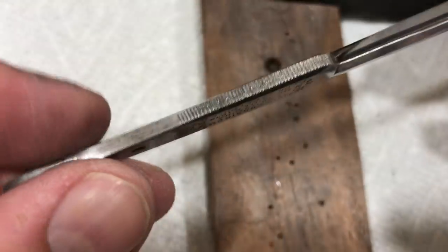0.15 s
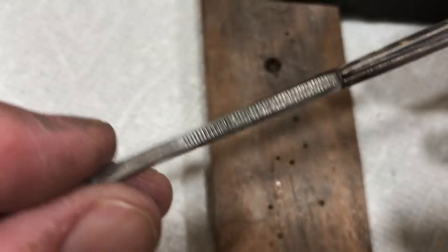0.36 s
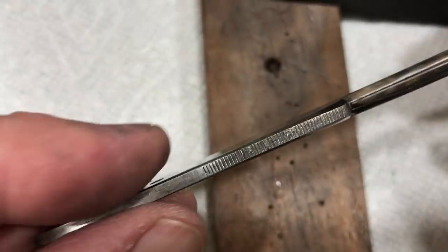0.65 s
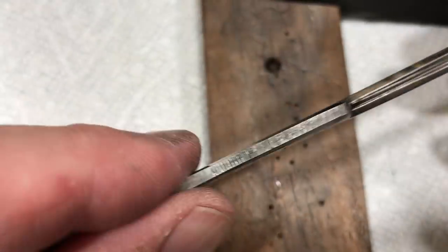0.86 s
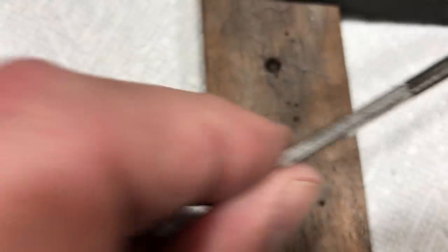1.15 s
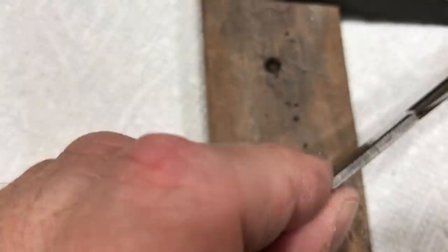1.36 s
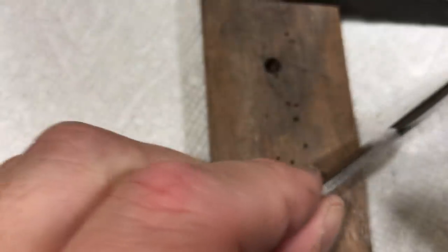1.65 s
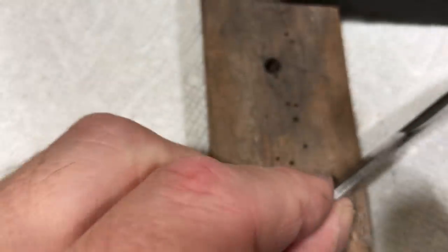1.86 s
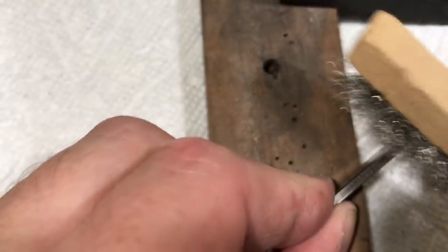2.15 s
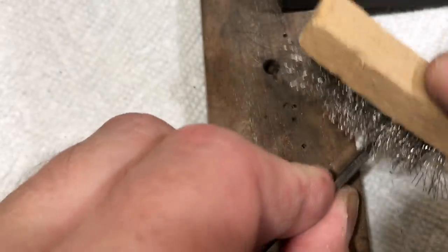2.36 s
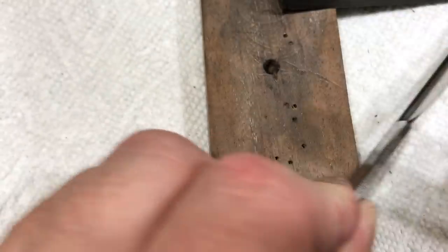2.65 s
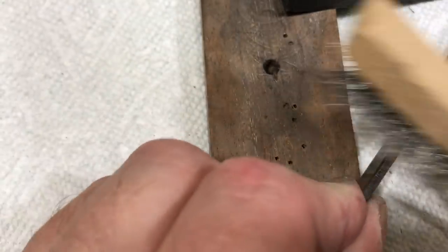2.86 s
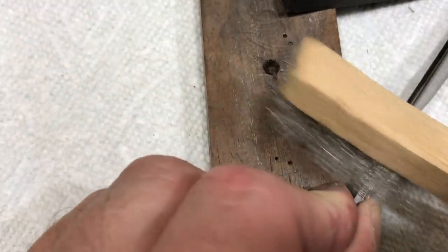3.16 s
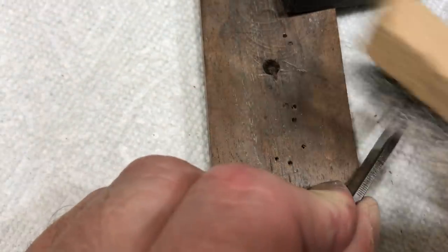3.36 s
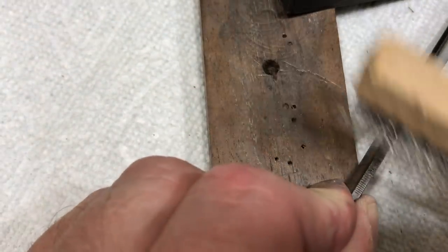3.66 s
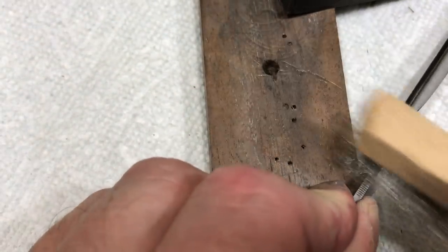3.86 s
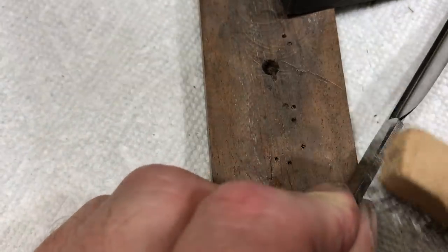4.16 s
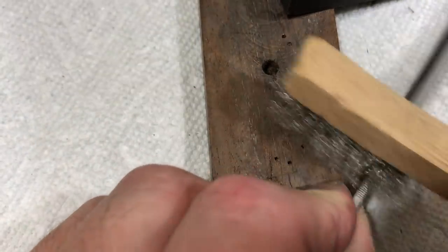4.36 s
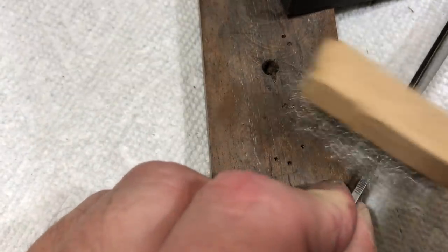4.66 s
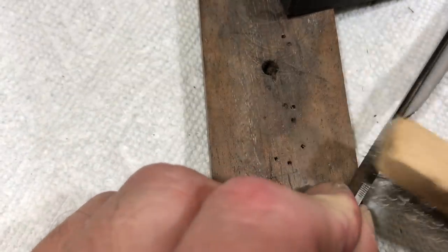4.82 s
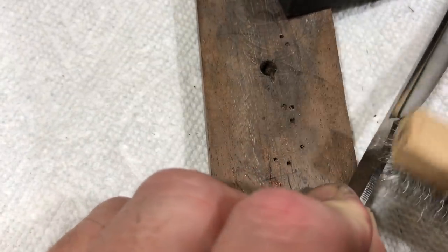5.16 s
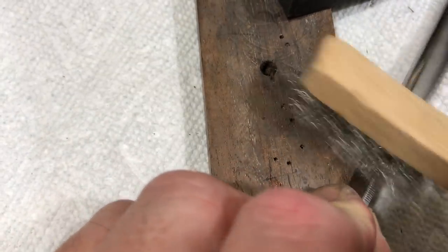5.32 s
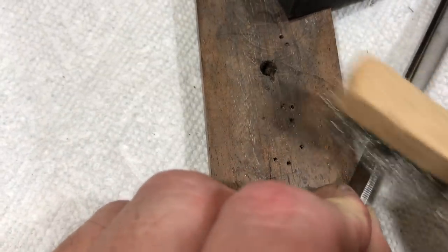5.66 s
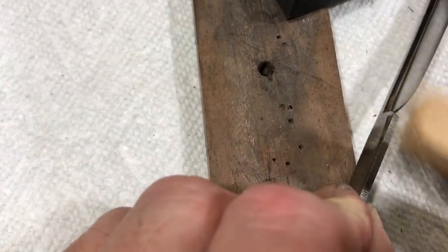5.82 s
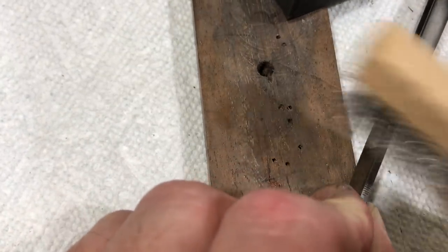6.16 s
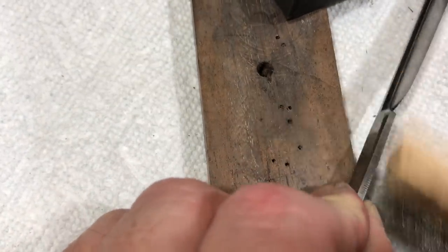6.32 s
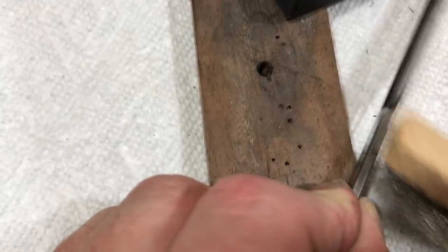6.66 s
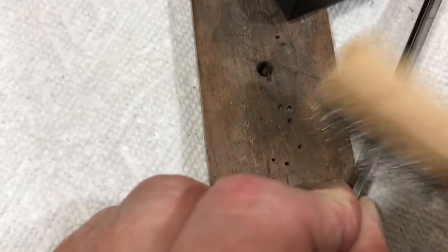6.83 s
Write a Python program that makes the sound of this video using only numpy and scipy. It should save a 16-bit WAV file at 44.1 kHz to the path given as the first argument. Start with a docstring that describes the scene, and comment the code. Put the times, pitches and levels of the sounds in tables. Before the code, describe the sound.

Close up in a quiet room with a low murmur of air, fingers slide very faintly on a steel blade while a distant bird chirps now and then. Bristles graze the metal lightly, then a small wire brush scrubs it in twelve short, fast strokes, bright and scratchy with hissing tips, snaps and a damped metallic ring. The wooden block beneath gives low knocks and one strong dull thud near the end.

```python
"""A small wire brush scrubs a hand-held steel blade on a wooden block, close up in a quiet room: twelve fast
strokes, each a touch, a landing and a pressed sweep. Wire tips catch and flick free; these random impacts
excite the resonances of steel, blade and block. Before that, fingers slide along the steel; bristles graze
it lightly then and between strokes. The block thuds dully four times, once strongly, and two soft hums come late.
A far bird, made of two fluttering sine voices, chirps over room air (coloured noise) and a short diffuse tail."""
import sys
import numpy as np
from scipy import signal
from scipy.fft import rfft, irfft, next_fast_len
from scipy.io import wavfile
from scipy.ndimage import map_coordinates

SR = 44100
rng = np.random.default_rng(int(sys.argv[2]) if len(sys.argv) > 2 else 0)


def wav_record(signal):
    """Record a signal, one row per channel, as 16-bit PCM in the file named by sys.argv[1]."""
    frames = np.transpose(np.atleast_2d(signal))
    bounded = np.clip(frames, -1, 1)
    # unit amplitude maps onto the largest positive 16-bit level
    quanta = np.round(bounded * 32767).astype(np.int16)
    wavfile.write(sys.argv[1], SR, quanta)


N = 308259  # length [samples]


def amp(db):
    """Level definition: decibels to amplitude gain."""
    return 10 ** (np.asarray(db) / 20)


def unit(x):
    """Normalisation: x at rms 1."""
    return x / np.sqrt(np.mean(x ** 2) + 1e-20)


def along(points, hz):
    """Logarithmic frequency scale: (frequency, value) points joined by straight lines on it."""
    point_hz, value = np.transpose(points)
    return np.interp(np.log(hz + 1), np.log(point_hz + 1), value)


def wobble(rate):
    """Band-limited fluctuation: a smooth curve through random knots, rate of them a second."""
    knots = rng.standard_normal(int(N * rate / SR) + 4)
    return map_coordinates(knots, [np.arange(N) * rate / SR])


def filtered(x, response):
    """Linear filtering: the spectrum of x times a response of frequency."""
    size = next_fast_len(N + SR // 2)
    return irfft(rfft(x, size) * response(np.fft.rfftfreq(size, 1 / SR)), size)[:N]


def coloured(x, spectrum):
    """Spectral shaping: x through a broad response of unit power."""
    return filtered(x, lambda hz: unit(amp(along(spectrum, hz))))


def resonate(x, modes):
    """Modal superposition: parallel resonances of unit power, falling steeply below the lowest."""
    def response(hz):
        bank = 0
        for centre, width, db in modes:
            bank = bank + amp(db) * 1j * hz * width / (centre ** 2 - hz ** 2 + 1j * hz * width)
        corner = modes[0][0] * 2 / 3
        bank = bank * hz ** 4 / (hz ** 4 + corner ** 4)
        return bank / np.sqrt(np.mean(np.abs(bank) ** 2))
    return filtered(x, response)


def add(track, s, sound):
    """Superposition: mix a sound into the track at time s."""
    part = track[max(round(s * SR), 0):][:len(sound)]
    part += sound[:len(part)]


def flicks(per_second, clump_db, clump_rate):
    """Poisson process: tiny impacts of random size and sign that come in clumps, at rms 1."""
    count = rng.poisson(per_second / SR, N)
    hits = np.sqrt(count) * rng.choice([-1, 1], N) * rng.uniform(0.52, 1, N)
    return unit(hits * amp(clump_db * wobble(clump_rate)))


def shifting(x, depth_db, span_hz, span_s):
    """Moving excitation point: patches of the spectrum, span_hz by span_s apart, swell and fade."""
    z = signal.stft(x, nperseg=512)[2]
    steps = np.array([SR / 512 / span_hz, 256 / SR / span_s])  # knots per bin and per frame
    cells = np.indices(z.shape) * steps[:, None, None]
    field = map_coordinates(rng.standard_normal((200, 600)), cells, order=3, mode="mirror")
    return signal.istft(z * unit(amp(depth_db * field)), nperseg=512)[1][:N]


def brush():
    """Friction-driven vibration: wire tips hiss and ring the steel; their drag bends blade and shakes block."""
    snap, knock = snag_levels(rise=0.00047, t60=0.019, snap_db=4.5, knock_db=4.0)
    tufts = tuft_release(per_second=85, t60=.04, steady=1.3, scatter_db=2.0)
    *_, scratch_db, drag_db, push_db = np.transpose(STROKES)
    scratch = np.maximum(tufts * stroke_level(scratch_db, SCRATCH_LAW), snap)
    drag = np.maximum(tufts ** .5 * stroke_level(drag_db, DRAG_LAW), knock)
    push = np.maximum(stroke_level(push_db, PUSH_LAW), amp(-2.0) * knock)
    moving = wire_hiss(scratch) + steel_ring(scratch) + edge_rasp(drag) + grazes()
    return block(push) + blade(drag) + shifting(moving, depth_db=3.0, span_hz=169.7, span_s=.035)


# strokes of the brush: (first touch [s], wait until it bears down [s], length of the sweep [s],
# growth over half the sweep [dB], landing against the sweep [dB],
# relative levels: scratch of the wire tips [dB], drag along the blade [dB], push on the block [dB])
STROKES = [ (3.166, .034, .180, -2, -21.5, -23.3, -43.5, -37.5),
           (3.52, 0.02, 0.17, -1, -27, -22.5, -31.5, -31), (3.830, 0.023, 0.17, -2, -7.5, -20.5, -32, -33),
           (4.387, .073, .160, -2.5, -4, -21.5, -30, -35), (4.740, .064, .141, -2.5, -9, -21, -29.5, -30),
           (5.051, .057, .139, -3, -7, -21, -26.5, -33), (5.356, .053, 0.14, 0, -1.5, -20, -28, -32),
           (5.68, .040, 0.14, -1, -3.5, -22, -30, -32), (5.989, 0.044, 0.14, 0, -7.5, -22, -28, -40),
           (6.282, .026, .121, 2.5, -14, -20.5, -26.5, -30),
           (6.611, 0.027, .130, 6.5, -6.5, -22.5, -28, -39.5),
           (6.924, 0.017, .140, 0.5, -15.5, -22.5, -25, -33), ]
# how each layer follows a stroke: (lag of its sweep [s], fall to the ends of the sweep [dB],
# squareness of the arch [exponent], light contact at first [dB], light contact at lift-off [dB],
# fade after lift-off [dB/s], change of the landing [dB])
SCRATCH_LAW = (0.0072, 15, 3.5, -19, -30, 289, -7)
DRAG_LAW = (-0.01, 20.5, 2.5, -24.5, -23, 280.5, 0)
PUSH_LAW = (0.01, 12.5, 2, -23, -20.5, 230, 4.5)


def stroke_level(strengths_db, law):
    """Contact force envelope: wires touch and land, pressure arches over the sweep, the quiver then fades."""
    lag, edge_db, squareness, touch_db, lift_db, fade_db_per_s, share_db = law
    touch_s = 0.0046  # rise of the first contact
    landing_delay_s, landing_width_s = .033, 0.015  # front rows of wire strike the edge just after the touch
    out, t = np.zeros(N), np.arange(SR // 2) / SR
    for (s, wait, length, growth_db, landing_db, *_), db in zip(STROKES, strengths_db):
        across = np.clip(2 * (t - wait - lag) / length - 1, -2, 2)  # -1 to 1 over the sweep
        sweep = amp(growth_db * across - edge_db * np.abs(across) ** squareness)
        landing = amp(landing_db + share_db) * np.exp(-((t - landing_delay_s) / landing_width_s) ** 2)
        lift = wait + length
        contact_db = np.interp(t, [0, lift], [touch_db, lift_db])
        contact = amp(contact_db - fade_db_per_s * np.maximum(t - lift, 0))
        together = np.sqrt(sweep ** 2 + landing ** 2 + contact ** 2)
        add(out, s, amp(db) * np.minimum(t / touch_s, 1) * together)
    return out


def tuft_release(per_second, t60, steady, scatter_db):
    """Stick-slip: rows of wires cross the edge unevenly, each a short burst of power over the steady scrape."""
    t = np.arange(SR // 20) / SR
    times = np.cumsum(rng.uniform(.5, 1.5, 1000)) / per_second
    power = np.zeros(N)
    for s, db in zip(times, scatter_db * rng.standard_normal(len(times))):
        add(power, s, amp(db - 60 * t / t60) ** 2)
    return unit(np.sqrt(power / power.mean() + steady ** 2))


# tufts of wire that snag and snap free: (time [s], relative snap level [dB],
# relative level of the knock on the blade [dB])
SNAGS = [(2.289, -34.5, -54), (2.320, -34, -65), (2.408, -26, -57), (2.429, -25, -65), (3.122, -37, -68),
         (3.168, -34, -60), (3.184, -25, -53), (3.349, -20.5, -50), (3.373, -32, -61), (3.519, -33.5, -63),
         (3.557, -22, -44), (3.713, -29.5, -53), (3.87, -18.5, -21.5), (4.413, -19, -33), (4.421, -24, -39),
         (4.427, -21, -40), (4.402, -27, -39), (4.473, -18.5, -26.5), (4.756, -22.5, -35),
         (4.764, -21, -23), (4.822, -19, -26), (5.071, -22.5, -33), (5.085, -21, -27), (5.126, -20, -34),
         (5.358, -29, -55), (5.38, -20, -37), (5.394, -22.5, -36), (5.623, -25, -46), (5.628, -20.5, -50),
         (5.642, -21, -50), (5.686, -24.5, -50), (5.706, -19, -26), (5.821, -12.5, -46), (5.993, -34, -56),
         (6.059, -18.5, -25.5), (6.164, -23, -48.5), (6.635, -23, -43), (6.665, -17, -30), (6.96, -23, -32)]


def snag_levels(rise, t60, snap_db, knock_db):
    """Sudden release of stored strain: a short volley of wires gives the gains of snap and knock."""
    snap, knock, t = np.zeros(N), np.zeros(N), np.arange(SR // 10) / SR
    volley = (1 - np.exp(-t / rise)) * amp(-60 * t / t60)
    for s, wire_db, blade_db in SNAGS:
        add(snap, s, amp(wire_db + snap_db) * volley)
        add(knock, s, amp(blade_db + knock_db) * volley)
    return snap, knock


# spectrum of the wire tips: (frequency [Hz], relative level per Hz [dB])
WIRES = [(300, -40), (1500, -30), (2200, -12), (3200, -3), (4400, -6.5), (6300, 0.5), (7900, -9),
         (9600, -2.5), (10800, -7), (13200, 3), (15600, 0.5), (17000, -6.5)]


def wire_hiss(scratch):
    """Broadband impact noise: dense flicks of the wire tips."""
    tips = flicks(per_second=10000, clump_db=1.6, clump_rate=450)
    return amp(-1.9) * coloured(scratch * tips, WIRES)


# ringing of the steel under the wires: (frequency [Hz], width [Hz], relative level [dB])
STEEL = [(2700, 710, -3), (3440, 210, -3.5), (5327, 180, 9.5), (6000, 540, -15), (6990, 450, 5),
         (8260, 460, -1), (9420, 250, -1)]


def steel_ring(scratch):
    """Modal excitation: the flicks set the high resonances of the steel ringing."""
    return amp(-8.8) * resonate(scratch * flicks(per_second=5000, clump_db=4.5, clump_rate=340), STEEL)


# bending of the hand-damped blade: (frequency [Hz], width [Hz], relative level [dB])
BLADE = [(665.6, 71, 4.5), (993, 92, -2), (1405, 48, -1), (1602, 88, -4.5), (2400, 190, -19.5)]


def blade(drag):
    """Damped bending modes: the drag of the wires drives the blade, broadly resonant in the hand."""
    return amp(-2.6) * resonate(drag * flicks(per_second=3000, clump_db=3.5, clump_rate=300), BLADE)


# spectrum of the rasp: (frequency [Hz], relative level per Hz [dB])
RASP = [(30, -34.5), (70, -13), (130, -3.5), (300, -0.5), (450, -18.5), (800, -2), (1500, 2), (2100, -9),
        (3500, -28.5), (7000, -29)]


def edge_rasp(drag):
    """Friction noise: the drag along the blade as a broad, low rasp."""
    return amp(-5.4) * coloured(drag * flicks(per_second=4000, clump_db=1.0, clump_rate=240), RASP)


# resonances of the wooden block: (frequency [Hz], width [Hz], relative level [dB])
BLOCK = [(134, 71, -14), (249.5, 28, 4.5), (309.4, 29, 2), (344.4, 13, -10)]


def block(push):
    """Structure-borne sound: the push of the strokes reaches the low resonances of the wood."""
    return amp(-1.5) * resonate(push * flicks(per_second=3000, clump_db=2, clump_rate=150), BLOCK)


# bristles grazing the steel with no pressure: (time [s], length [s], level [dB])
GRAZES = [(2.285, 0.21, -46), (2.375, .07, -41), (2.66, 0.11, -54.5), (2.77, 0.059, -58), (3.03, .10, -43),
          (4.28, 0.065, -59), (4.388, .02, -39), (4.63, 0.029, -48.5), (5.57, .04, -53), (5.615, .035, -39)]
# spectrum of bristles that ring freely: (frequency [Hz], relative level per Hz [dB])
LOOSE_WIRES = [(1000, -13), (2050, -14.5), (2550, 2.5), (3400, 5), (4600, 2), (6500, 1), (8300, 0),
               (10500, -2.5), (14000, 2), (16000, -4)]


def grazes():
    """Free vibration: bristles that touch without pressure ring undamped in a bright, broad band."""
    grazing = touch_level(GRAZES, edge_db=7.5, fade_db_per_s=261.5)
    return coloured(grazing * flicks(per_second=6000, clump_db=4.0, clump_rate=150), LOOSE_WIRES)


def touch_level(touches, edge_db, fade_db_per_s):
    """Light contact envelope for (s, length, dB): a quick onset, a shallow arch and an exponential fade."""
    onset_db_per_s = 1200
    power, t = np.zeros(N), np.arange(-SR // 20, SR // 3) / SR
    for s, length, db in touches:
        arch = edge_db * np.clip(2 * t / length - 1, -1, 1) ** 2
        ends = onset_db_per_s * np.maximum(-t, 0) + fade_db_per_s * np.maximum(t - length, 0)
        add(power, s + t[0], amp(db - arch - ends) ** 2)
    return np.sqrt(power)


# fingers sliding on the steel: (time [s], length [s], relative ring level [dB], relative rub level [dB])
SLIDES = [(0.948, .09, -62, -86), (1.047, 0.011, -68, -55), (1.137, 0.06, -54, -72),
          (1.237, 0.023, -58.5, -65), (1.282, 0.052, -76, -65.5), (1.37, 0.12, -61.5, -67),
          (1.535, .052, -56.5, -50.5), (1.777, 0.038, -48, -48), (1.874, 0.091, -51.5, -63),
          (2.001, 0.024, -52, -64), (2.205, 0.032, -56, -60), (2.36, .11, -47, -70),
          (2.516, 0.031, -50.5, -61), (2.586, 0.014, -53, -76), (2.87, 0.023, -50, -45)]
# the steel when rubbed by skin: (frequency [Hz], width [Hz], relative level [dB])
RUBBED = [(3163, 110, 2.5), (4170, 130, -10.5), (5460, 180, -5), (6730, 230, -15), (8000, 100, -8),
          (10940, 240, -17), (13000, 530, -36.5)]
# spectrum of the rubbing skin: (frequency [Hz], relative level per Hz [dB])
SKIN = [(2000, -47), (3100, 1), (4200, -7), (6700, -5.5), (8500, 6.5), (10000, -11.5), (12000, 2),
        (14500, -5), (16000, -9)]


def fingers():
    """Granular friction: skin slips over the ridged steel in fine grains, its ring changing with the grip."""
    s, length, ring_db, rub_db = np.transpose(SLIDES)
    ringing = touch_level(zip(s, length, ring_db), edge_db=7.5, fade_db_per_s=254)
    rubbing = touch_level(zip(s, length, rub_db), edge_db=7.5, fade_db_per_s=254)
    ring = resonate(ringing * flicks(per_second=12000, clump_db=2.5, clump_rate=62), RUBBED)
    rub = coloured(rubbing * flicks(per_second=14000, clump_db=4.0, clump_rate=130), SKIN)
    slide = amp(3.0) * ring + amp(2.6) * rub
    return shifting(slide, depth_db=4.5, span_hz=450, span_s=.045)


# dull bumps of the block: (time [s], level [dB])
BUMPS = [(3.174, -44), (5.285, -40), (6.433, -18), (6.52, -37)]
# modes of the bumped block and bench: (frequency [Hz], relative level [dB], t60 [s])
BENCH = [(58, -15.5, 0.18), (130.3, -5.5, 0.11), (172, -4.5, 0.081), (244.5, -2, .09), (317.4, -7, 0.094),
         (684, -11, 0.035), (1376, -10, 0.028)]


def bumps():
    """Impulse response of damped modes: the pressed block rocks against the bench with a soft thud."""
    out, t = np.zeros(N), np.arange(SR // 3) / SR
    thud = sum(amp(db - 60 * t / t60) * np.sin(2 * np.pi * hz * t) for hz, db, t60 in BENCH)
    thud = thud * (1 - np.exp(-t / 0.0014))  # soft onset
    for s, db in BUMPS:
        add(out, s, amp(db) * thud)
    return out


# faint hums late among the strokes: (time [s], length [s], pitch [Hz], level [dB])
HUMS = [(6.49, 0.15, 505, -57.5), (6.816, 0.05, 682, -47.5)]


def hums():
    """Pure tones: short sines that swell and fade under a squared-sine envelope."""
    out = np.zeros(N)
    for s, length, hz, db in HUMS:
        t = np.arange(round(length * SR)) / SR
        swell = np.sin(np.pi * t / length) ** 2
        add(out, s, amp(db) * swell * np.sin(2 * np.pi * hz * t))
    return out


# bird chirps: (time [s], relative level [dB])
CHIRPS = [(0.265, -47), (1.423, -46.5), (2.949, -50), (3.672, -47.5), (5.528, -51)]
# course of one chirp: (time after its start [s], pitch of the lower voice [Hz], relative level [dB])
CHIRP = [(0, 3700, -19.5), (.028, 3950, -7), (.04, 3900, 0), (.07, 3550, -2), (.1, 3050, -2.5),
         (.125, 2780, -15), (.15, 2700, -41)]


def bird(waver_hz, flutter_db, upper_ratio, upper_db):
    """Frequency and amplitude modulation: a hoarse chirp, briefly rising then falling, in two fluttering voices."""
    out, t = np.zeros(N), np.arange(SR // 6) / SR
    times, pitch_hz, shape_db = np.transpose(CHIRP)
    pitch, shape = np.interp(t, times, pitch_hz), np.interp(t, times, shape_db)
    for ratio, voice_db in [(1, 0), (upper_ratio, upper_db)]:
        waver, flutter = waver_hz * wobble(900), flutter_db * wobble(250)
        for s, db in CHIRPS:
            start = round(s * SR)
            now = slice(start, start + len(t))
            phase = 2 * np.pi * np.cumsum(ratio * pitch + waver[now]) / SR
            add(out, s, amp(db + voice_db + shape + flutter[now]) * np.sin(phase))
    return out


# decay of the room: (frequency [Hz], t60 [s])
ROOM = [(150, 0.28), (1000, 0.39), (5000, 0.28), (15000, .16)]


def room(x):
    """Diffuse reverberation: a short noise tail of unit energy, each frequency dying at its own speed."""
    hz, t, z = signal.stft(rng.standard_normal(SR // 2), SR, nperseg=256)
    decay = amp(-60 * t / along(ROOM, hz)[:, None])
    tail = signal.istft(z * decay, SR, nperseg=256)[1]
    delayed = np.pad(tail, (SR // 200, 0))  # starts 5 ms after the direct sound
    return signal.fftconvolve(x, delayed / np.linalg.norm(tail))[:N]


# spectrum of the room air: (frequency [Hz], relative level per Hz [dB])
AIR = [(25, -40.5), (50, -3.5), (76, -20.5), (115, -3.5), (180, -7.5), (270, -1.5), (560, -15.5),
       (1260, -19), (2100, -25.5), (3200, -27), (6200, -34), (10000, -37.5), (16000, -37.5)]


def room_air():
    """Stationary background noise: a low murmur of coloured noise whose level drifts slightly."""
    return amp(-63 + 0.84 * wobble(10)) * coloured(rng.standard_normal(N), AIR)


def scene():
    """Direct and reverberant fields: close handwork, a far bird, their room tail and the air."""
    near = brush() + fingers() + bumps() + hums()
    far = bird(waver_hz=180, flutter_db=4.5, upper_ratio=1.13, upper_db=-7.5)
    tail = room(amp(-24.5) * near + amp(-11.5) * far)
    return (near + far + tail + room_air())[None]


def record(dry):
    """Band limitation: the microphone drops the deepest bass and cuts off steeply above its top."""
    bass_hz, top_hz = 36, 15800

    def response(hz):
        bass_cut = hz ** 4 / (hz ** 4 + bass_hz ** 4)
        return bass_cut / np.sqrt(1 + (hz / top_hz) ** 400)
    return filtered(dry[0], response)[None]


dry = scene()
out = record(dry)
wav_record(out)
```